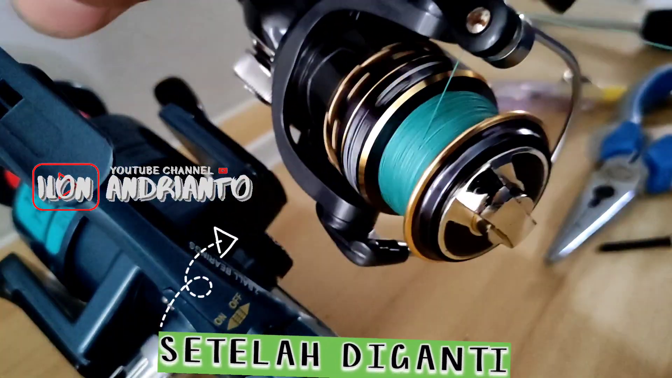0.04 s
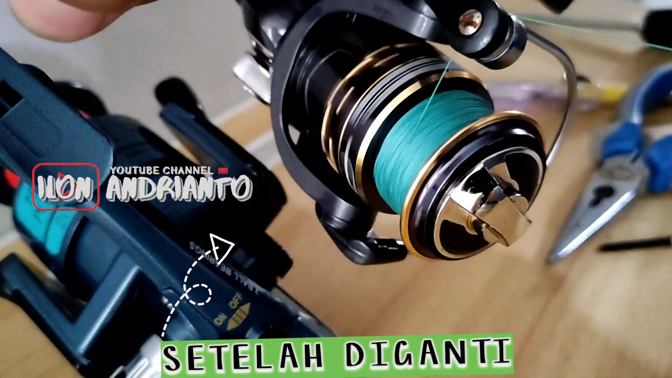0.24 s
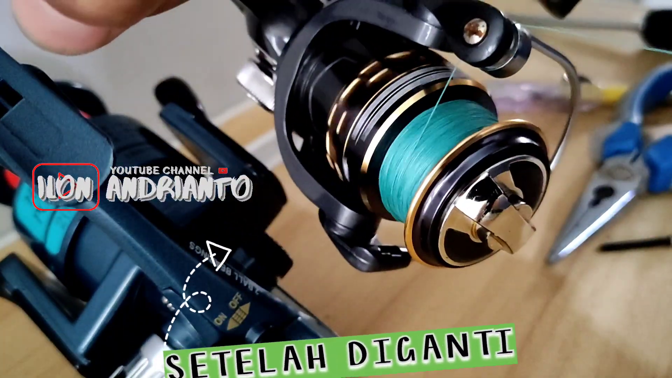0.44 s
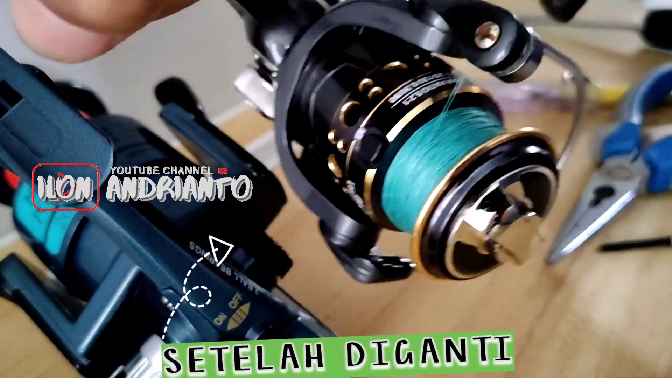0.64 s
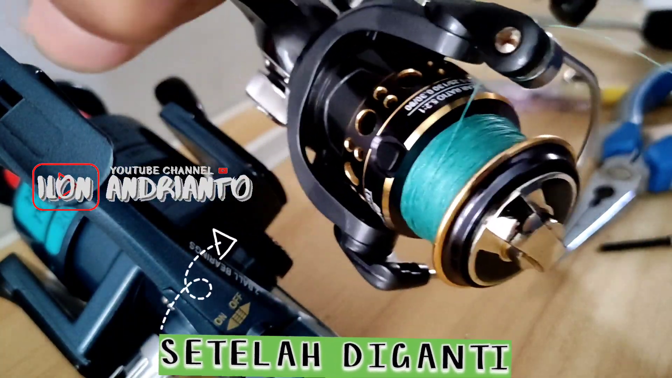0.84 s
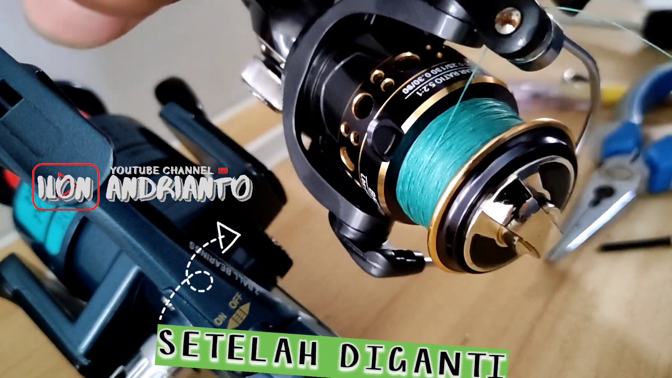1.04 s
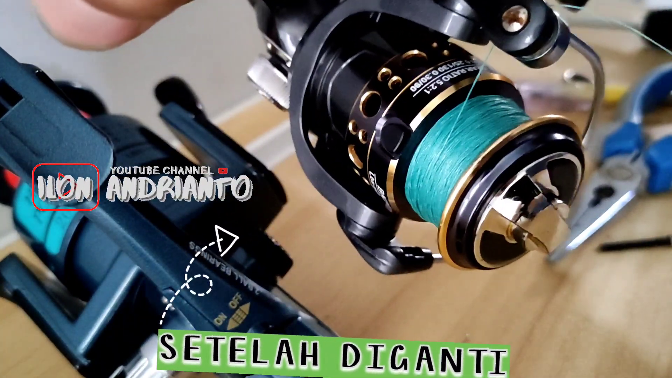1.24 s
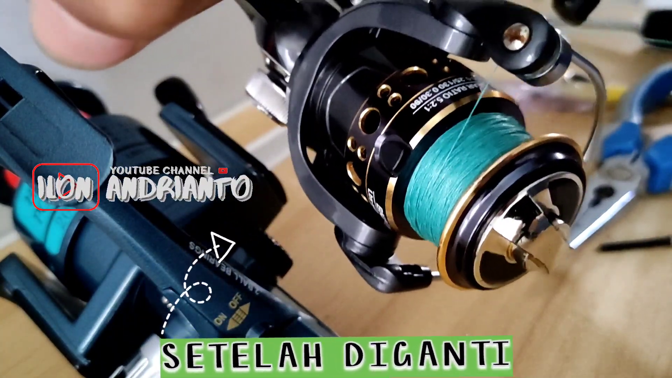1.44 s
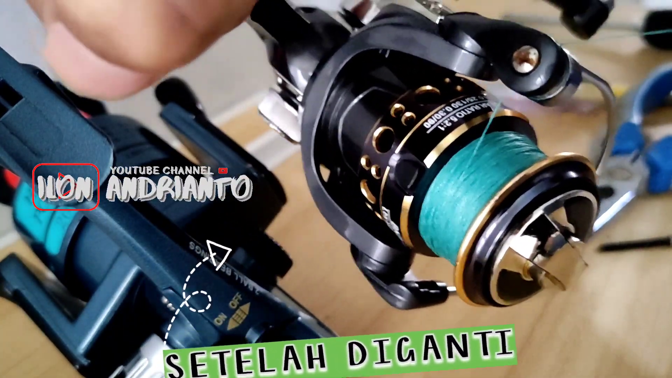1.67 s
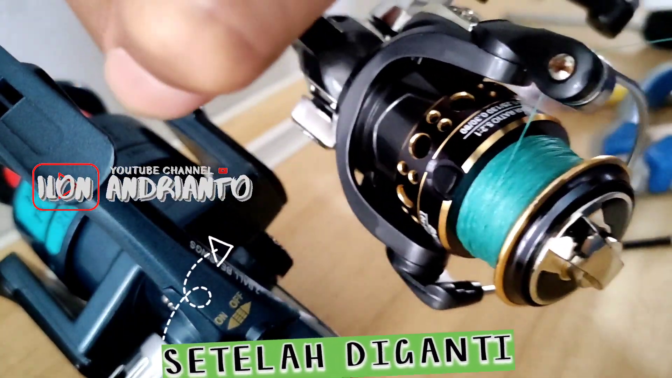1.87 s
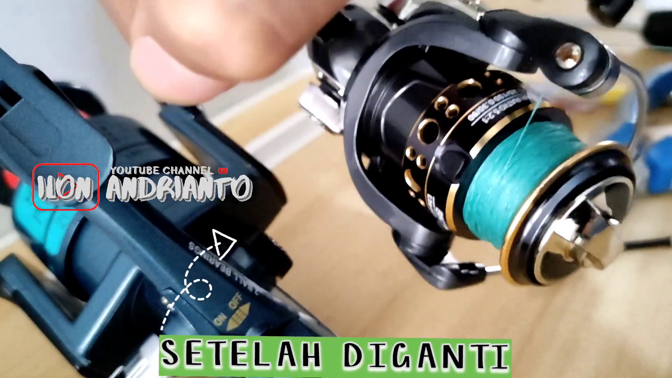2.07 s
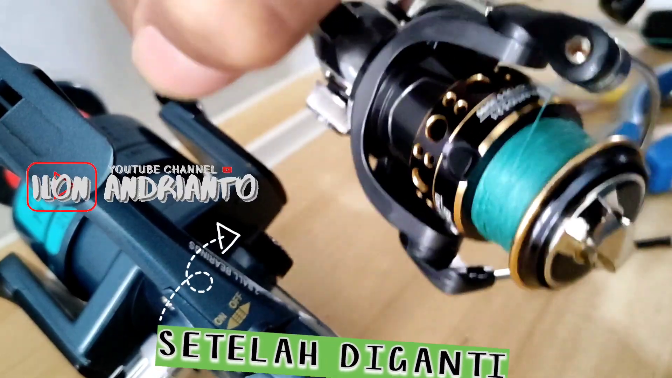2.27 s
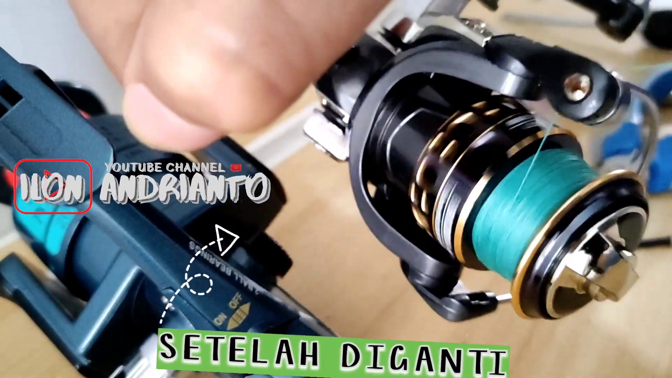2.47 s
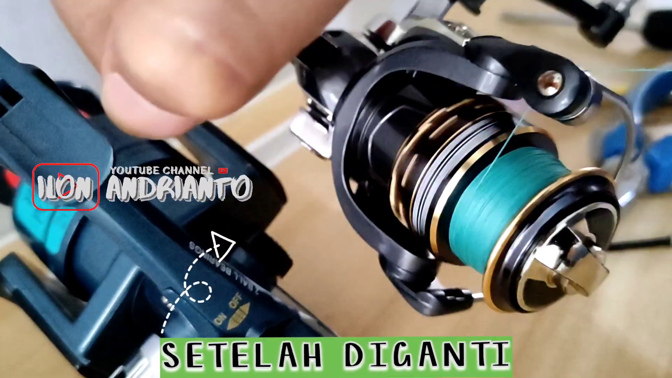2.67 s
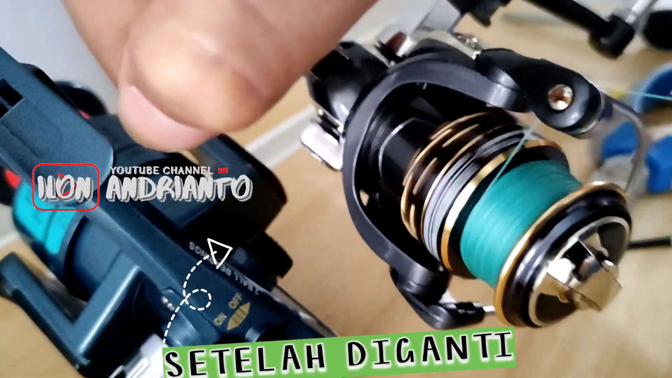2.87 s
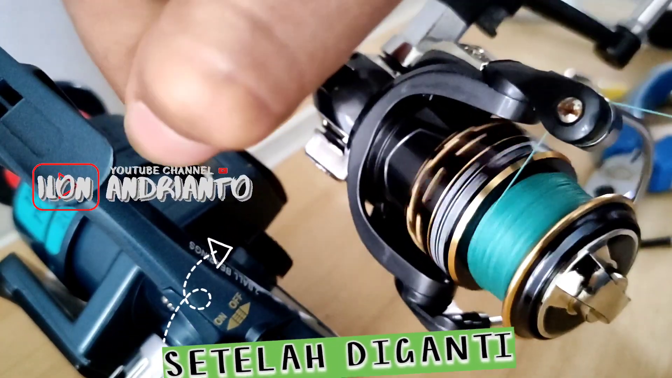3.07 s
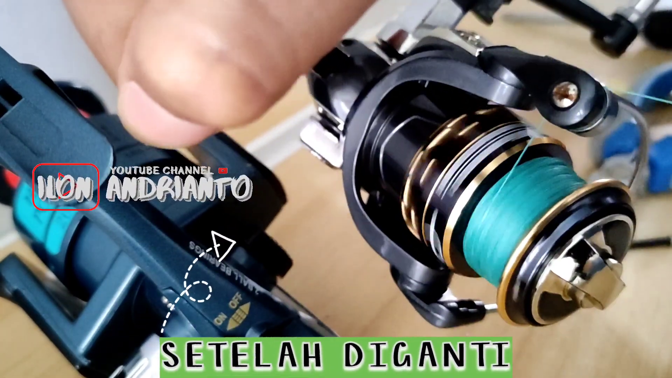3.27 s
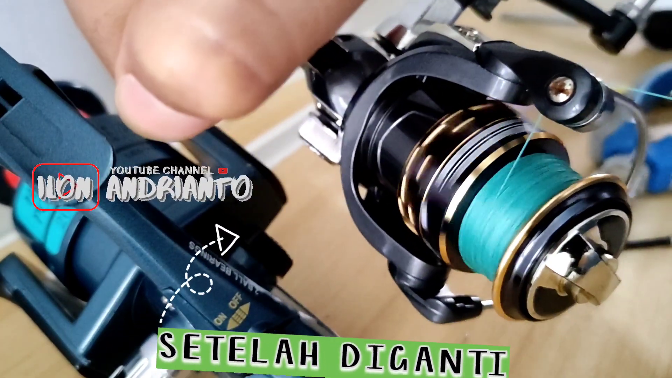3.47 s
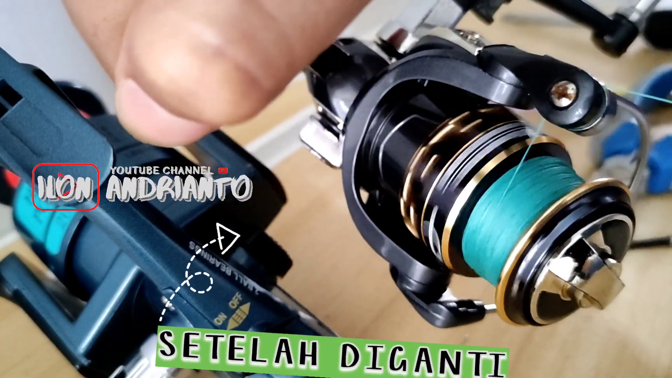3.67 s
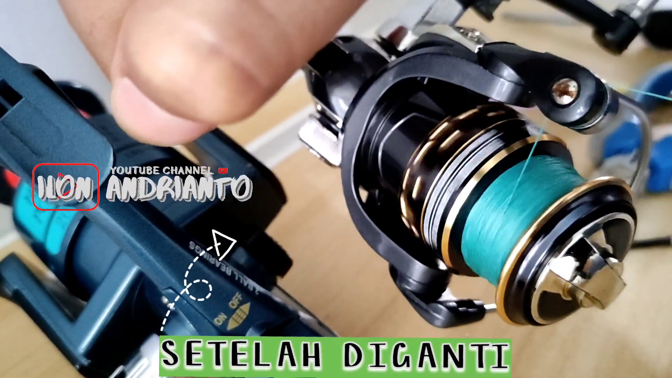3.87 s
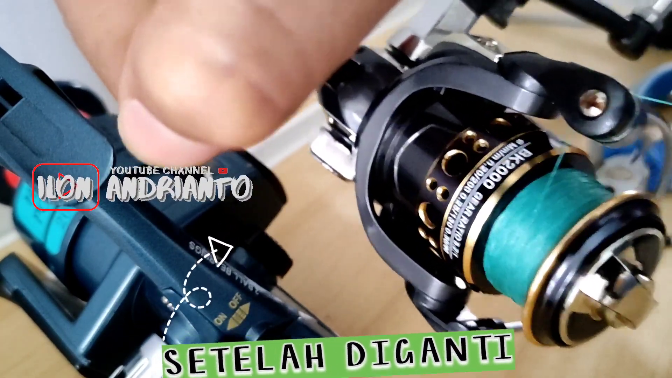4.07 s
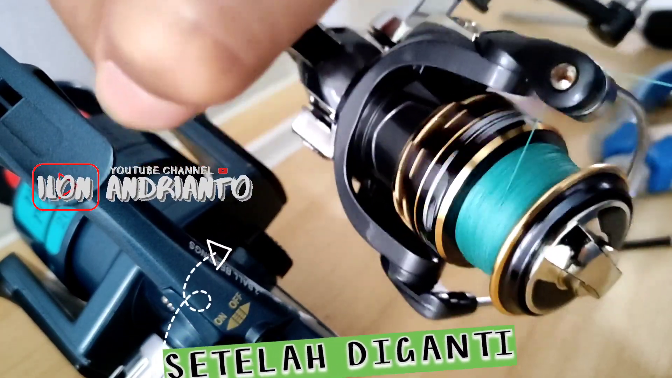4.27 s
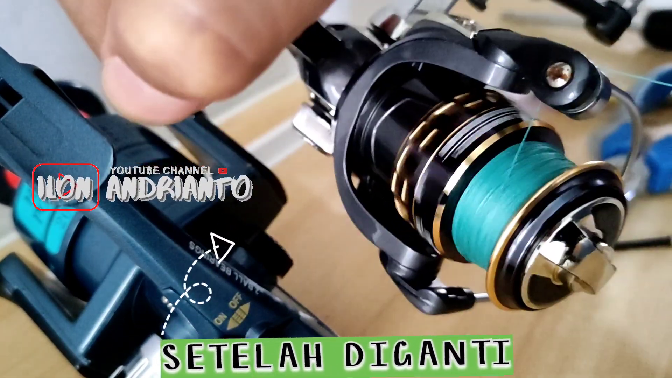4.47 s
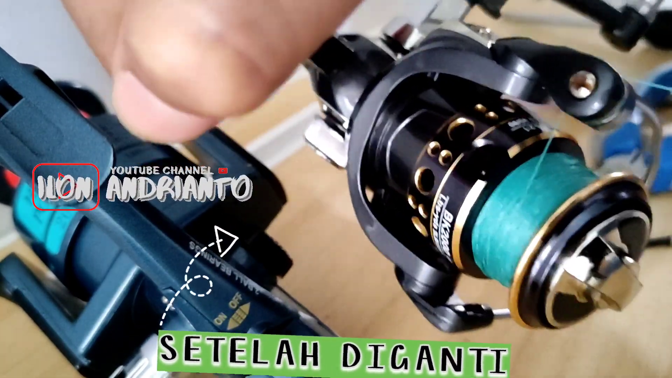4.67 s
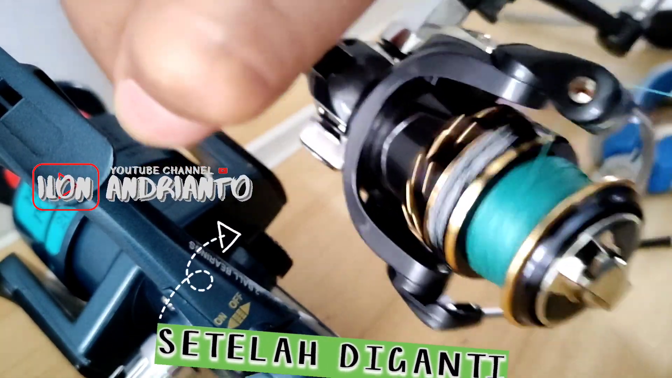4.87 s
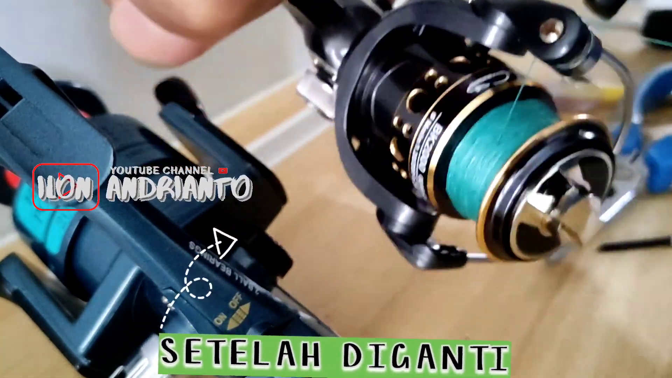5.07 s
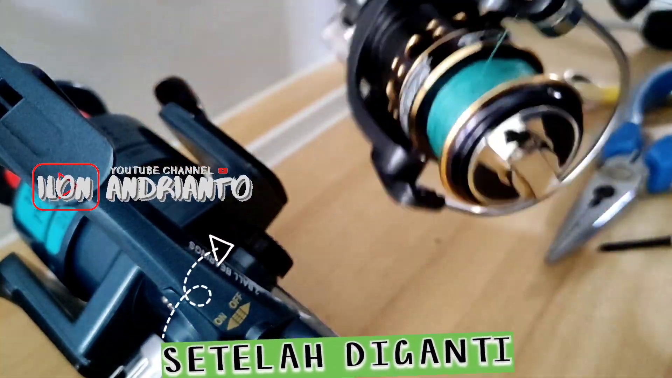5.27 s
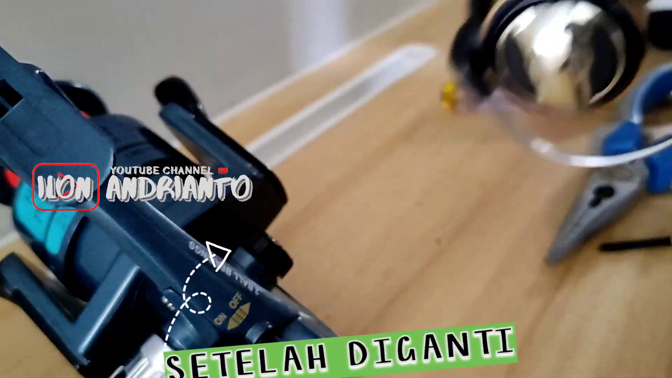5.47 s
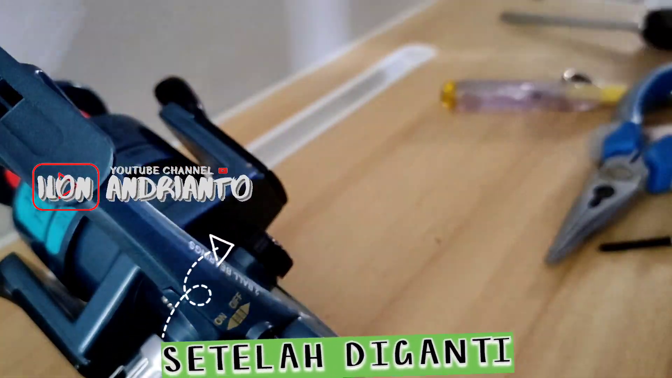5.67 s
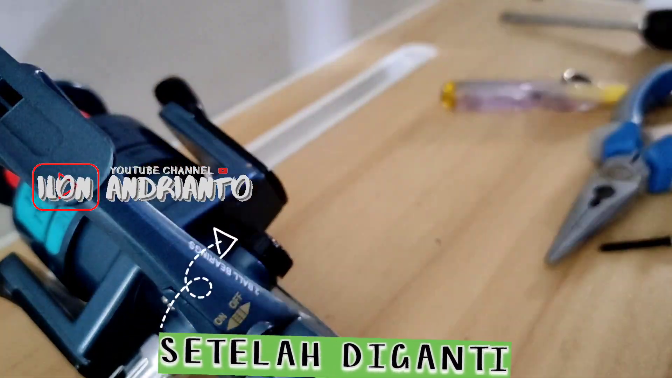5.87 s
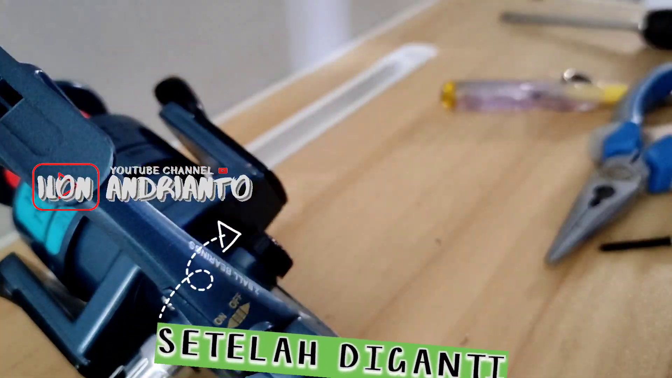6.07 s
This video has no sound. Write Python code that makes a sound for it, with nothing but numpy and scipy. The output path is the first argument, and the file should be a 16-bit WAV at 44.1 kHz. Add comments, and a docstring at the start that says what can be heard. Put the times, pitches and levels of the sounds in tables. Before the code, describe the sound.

A fishing reel's clicker ratchets in four rapid bursts close to the microphone, with a hard finger knock between the first two, in a quiet room.

```python
"""A fishing reel close to a stereo microphone in a quiet room gives up line in four pulls.
A spring pawl snaps over the teeth under the spool: short noise bursts through body resonances.
The metal spool rings on in four decaying modes; the reel swings and rubs in the hand as low thumps and noise.
Between the first two pulls a finger hisses past the left port and knocks hard, with faint taps then
and after the last pull. Short echoes and a low room tone with a hum lie behind."""
import sys
import numpy as np
from scipy import signal
from scipy.fft import rfft, irfft
from scipy.io import wavfile
from scipy.ndimage import uniform_filter1d

SR = 44100
rng = np.random.default_rng(int(sys.argv[2]) if len(sys.argv) > 2 else 0)


def dump(signal):
    """Clip the signal to [-1, 1] and save it as 16-bit WAV at the path in sys.argv[1]."""
    limited = np.clip(np.atleast_2d(signal).T, -1, 1)
    pcm = np.round(limited * 32767).astype(np.int16)
    wavfile.write(sys.argv[1], SR, pcm)


N = 269890  # samples

# One row for each snap of the pawl: t/s, relative blow level/dB,
# relative ring level/dB of the first and of the second spool mode 10 ms after the snap
PAWL_SNAPS = [(0.0001, -34, -41, -33.5), (0.025, -18.5, -48, -26), (0.0508, -16.5, -31.2, -27.0),
              (0.0872, -17, -30.8, -22.5), (0.1143, -16, -37.9, -22), (0.1385, -24, -30, -21),
              (0.156, -12, -34, -19.5), (0.173, -12, -42.7, -26.8), (0.1901, -20, -29, -36),
              (0.2072, -15, -25, -26), (0.225, -26, -21, -23), (0.2415, -19.3, -20, -19.5),
              (0.2572, -19.8, -24, -22.5), (0.274, -27, -24, -20), (0.2905, -14, -26, -33),
              (0.306, -16, -33, -25.5), (0.326, -24, -38, -30), (0.3441, -16, -26.5, -33.5),
              (0.3639, -20, -33, -28), (0.384, -17, -38, -14), (0.404, -29, -28.5, -17),
              (0.427, -23, -25.6, -14.5), (0.4504, -10, -43, -19.7), (0.4745, -15, -36.4, -24),
              (0.4962, -13, -30, -28.1), (0.5216, -21, -24, -35.6), (0.549, -13, -44, -25),
              (0.5793, -17.0, -29, -26), (0.6049, -25, -29, -24), (0.649, -13, -27.0, -33),
              (2.625, -12.5, -45, -29.2), (2.6527, -10, -47.4, -33), (2.673, -14, -35, -32),
              (2.692, -21, -30, -26), (2.7108, -13, -35.7, -27.5), (2.7314, -18, -32.1, -22),
              (2.7508, -13, -36, -36), (2.7679, -17, -34.1, -29.1), (2.785, -12.5, -34.7, -20),
              (2.802, -19, -25, -24), (2.8189, -13.5, -24, -19), (2.836, -18, -28, -26),
              (2.8537, -24, -36, -34), (2.8702, -16.1, -28, -31.2), (2.888, -7.5, -24, -25),
              (2.9063, -12, -29, -23.5), (2.9216, -16, -31.0, -32), (2.937, -16, -29.9, -31.2),
              (2.9498, -19, -22, -34.9), (2.9625, -19, -28, -20.5), (2.9766, -14.5, -37, -22),
              (2.993, -12, -27, -25), (3.0055, -22, -31.5, -23), (3.0182, -13, -38, -26),
              (3.031, -20, -37, -25), (3.0446, -30, -23, -17.5), (3.0577, -16, -19.5, -28),
              (3.072, -20.5, -36, -30), (3.0847, -16, -31, -27.9), (3.0978, -9, -29, -33),
              (3.11, -17, -35, -27.1), (3.122, -13, -26, -29.9), (3.1358, -24, -28.0, -25.2),
              (3.149, -13, -28, -28), (3.1636, -9, -35, -21.5), (3.1777, -11, -35, -21),
              (3.1914, -21, -39.0, -21), (3.2037, -15, -40, -23.0), (3.2157, -11, -41, -27),
              (3.2285, -17.5, -32, -25), (3.244, -28, -25.3, -16.5), (3.2582, -17, -29, -25),
              (3.2742, -20.0, -37, -25.5), (3.2899, -21, -38, -25.5), (3.3078, -15, -29, -30.8),
              (3.325, -15, -27, -40), (3.346, -19, -40, -36.2), (3.3689, -16.6, -28, -25.0),
              (3.3922, -14, -38, -30.1), (3.414, -11, -45.5, -26), (3.4399, -16.3, -37, -21.4),
              (3.4682, -12.5, -24, -38), (3.49, -19, -50, -36.1), (3.5158, -11.5, -43, -32),
              (3.542, -11, -36, -25.8), (3.568, -19, -25, -29), (3.59, -28, -33, -36.5),
              (3.6098, -18.9, -29.5, -29.7), (3.6337, -20, -29, -29), (3.657, -13, -30, -32),
              (3.6794, -12, -36, -29), (3.7067, -16, -48, -48), (3.7363, -15.5, -26.5, -45),
              (3.768, -18, -28.5, -32.4), (3.803, -13, -39, -23), (3.836, -17.5, -32.5, -42),
              (3.8649, -18, -19.5, -40.5), (3.895, -11, -24, -22), (3.9239, -11, -32, -20),
              (3.9616, -15, -23.5, -34), (3.9996, -20, -21.5, -30.3), (4.0344, -20.5, -25.5, -26.5),
              (4.2627, -13, -24, -22.5), (4.2794, -18, -34, -51), (4.3005, -14, -29.5, -25),
              (4.319, -15.0, -34, -22), (4.333, -12, -32, -30), (4.351, -20, -35, -23),
              (4.369, -19.6, -37, -24), (4.3857, -17.6, -31, -20.5), (4.4072, -25, -35, -27.5),
              (4.4287, -18.5, -27, -27), (4.45, -14, -24, -32.5), (4.47, -11, -35, -30),
              (4.4928, -12, -28, -29), (4.517, -19, -19, -23), (4.5432, -24, -32, -31),
              (4.5707, -17, -27, -24.5), (4.5988, -17.5, -30.4, -25.5), (4.6418, -11, -22, -36),
              (4.6743, -20, -25.7, -25), (4.9826, -11.5, -32, -39), (5.007, -14, -25, -24),
              (5.037, -15, -27.5, -42), (5.06, -11, -35.8, -26), (5.0857, -19, -29, -31),
              (5.1107, -23, -33, -31.5), (5.1395, -12, -25, -30.1), (5.1651, -17, -32, -34),
              (5.1968, -16, -25, -30)]


def amp(db):
    """Amplitude factor of a level in dB."""
    return 10 ** (np.asarray(db) / 20)


def evened(x):
    """Scales a signal to an rms of one."""
    return x / np.sqrt(np.mean(x ** 2) + 1e-20)


def read(points, hz):
    """Reads a (f/Hz, value) curve along a logarithmic frequency axis."""
    f, value = np.transpose(points)
    return np.interp(np.log(hz + 1), np.log(f + 1), value)


def level(rows):
    """Gain from (t/s, level/dB) rows, at -120 dB outside them."""
    s, db = np.transpose(rows)
    return amp(np.interp(np.arange(N) / SR, s, db, left=-120, right=-120))


def struck(s, size, shape, lead=0.):
    """Lays one shape at every time s, starting lead seconds early."""
    train = np.zeros(N + SR)
    np.add.at(train, np.round(np.asarray(s) * SR).astype(int), size)
    return signal.oaconvolve(train, shape)[round(lead * SR):][:N]


def noise(colour, same, lean, patchy_db):
    """Stereo noise of a given spectrum, likeness and balance, with drifting patches, at an rms of one."""
    frames, hz = N // 256 + 5, np.fft.rfftfreq(1024, 1 / SR)
    a, b, c, d, patches = rng.standard_normal((frames, 513, 5)).T
    patches = uniform_filter1d(patches, size=10, axis=0)
    patches = evened(uniform_filter1d(patches, size=10, axis=1))
    like = np.clip(read(same, hz), -1, 1)[:, None]
    side = amp(read(lean, hz)[:, None] / 2)
    left = a + 1j * b
    right = like * left + np.sqrt(1 - like ** 2) * (c + 1j * d)
    spectrum = np.array([left * side, right / side])
    spectrum *= amp(read(colour, hz)[:, None] + patchy_db * patches)
    return evened(signal.istft(spectrum, nperseg=1024, noverlap=768)[1][:, :N])


def teeth():
    """The tooth row for each snap: the ring of teeth goes round and round."""
    # The 15 teeth of one turn, each with its own colour: low, middle and high level/dB against the blow,
    # relative ring level/dB of the third and of the fourth spool mode
    tooth_rows = [(-11.5, 0, -3, -31, -34.5), (-11, 0.5, -0.5, -33, -43.5), (-7.5, 0.5, -4, -30, -40),
                  (-6.5, -1, 1.5, -45, -38), (-8.5, -4, 0, -38, -45.5), (-5.5, 2.5, 2.5, -35, -38),
                  (-5.5, 1.5, 0.5, -31, -45), (-7, -1, -1, -37.5, -50), (-2, 0, 1.5, -39, -41),
                  (-7, -4, -2, -29, -42), (-1.5, 1.5, 1.5, -39, -33.5), (-5.5, -7.5, -0.5, -36, -48),
                  (-5.5, -2, 1.5, -37, -38), (-5, -1.5, 1.5, -35, -44), (-8.5, -6.5, -0.5, -45, -36.5)]
    return np.transpose(tooth_rows)[:, np.arange(len(PAWL_SNAPS)) % len(tooth_rows)]


def blows():
    """Time, chatter length and low, middle and high body level of each snap; a slow pawl chatters longer."""
    # Chance from snap to snap in the low, middle and high body range: spread/dB
    colour_spread = (2.5, 3.5, 2)
    # Level of the low body range through the pulls: t/s, level/dB
    low_level = [(0, -1.5), (.65, -1), (2.6, 0), (3.4, 0.5), (4.05, 0.5), (4.3, -1), (4.7, -0.5), (5.0, -1),
                 (5.2, -3.5)]
    usual_db, follows = -19, (0.13, 0.72, 0.57)  # how far each range follows a harder or softer blow
    usual_gap_s, longest_gap_s = 0.023, 0.04
    usual_chatter_ms, chatter_spread, gap_power = 2.2, 0.2, 0.1
    s, blow_db = np.transpose(PAWL_SNAPS)[:2]
    luck = np.clip(rng.standard_normal((4, len(s))), -2, 1.5)
    gap = np.clip(np.diff(s, prepend=s[0] - usual_gap_s), .005, longest_gap_s)
    slowness = (gap / usual_gap_s) ** gap_power
    chatter_ms = usual_chatter_ms * slowness * np.exp(chatter_spread * luck[3])
    force_db = usual_db + np.outer(follows, blow_db - usual_db)
    colour_db = teeth()[:3] + np.reshape(colour_spread, (3, 1)) * luck[:3]
    colour_db[0] += np.interp(s, *np.transpose(low_level))
    return np.vstack([s, chatter_ms, force_db + colour_db])


def snaps(rise_ms=1.0, fall=0.86, lumps_db=1.86, shared=0.38, shift=0.018, uneven_db=2.56,
          side_db=0.4, strike=3.36):
    """The pawl lands and chatters for a few ms; the rattle passes through the reel body."""
    # Resonances of the reel body in a low, middle and high range:
    # f/Hz, nominal width/Hz, left level/dB, right level/dB
    body_modes = [
        [(1305, 890, -14, -11), (3200, 530, -6, -5), (3790, 676, 1, 1), (4700, 970, -2.5, -4.5)],
        [(5656, 590, -7.5, -5), (6760, 300, -9.5, -4.5), (7840, 400, -19.5, -8.5), (8950, 370, -15.5, -4)],
        [(10800, 790, -3, -16), (11990, 1170, -4, -11), (13050, 620, -17, -9), (13940, 4700, -5, -12)],
    ]
    s, chatter_ms, *range_db = blows()[:, :, None]
    count, size, lead = len(s), 1024, 256  # a snap has 1024 samples, 256 of them ahead of the contact
    ms = (np.arange(size) - lead) / SR * 1000
    hz = np.fft.rfftfreq(size, 1 / SR) + 1
    rise = np.exp(np.minimum(ms, 0) / rise_ms)
    burst = np.where(ms < 0, rise, np.exp(-(abs(ms) / (fall * chatter_ms)) ** 1.25))
    lumps = evened(uniform_filter1d(rng.standard_normal((count, size)), size=20))
    common, left, right = rng.standard_normal((3, count, size))
    grain = np.sqrt(shared) * common + np.sqrt(1 - shared) * np.array([left, right])
    rattle = rfft(burst * amp(lumps_db * lumps) * grain)
    # the first sharp contact
    rattle = rattle + strike * np.exp(-2j * np.pi * np.arange(len(hz)) * lead / size)
    clicks = 0
    for db, modes in zip(range_db, body_modes):
        body = 0
        for mode_hz, width, *port_db in modes:
            # the body's pitches and levels wander a little by chance from snap to snap
            luck = rng.standard_normal((3, count, 1))
            centre = mode_hz * (1 + shift * luck[2])
            peak = 1 / (1 + .64j * (hz - centre ** 2 / hz) / width) ** 2
            gain = amp(np.reshape(port_db, (2, 1, 1)) + uneven_db * luck[:2])
            body = body + gain * np.sqrt(SR / (np.pi * width)) * peak
        sound = rattle * body
        # chance sets the grain of a snap; its energy follows the blow
        energy = np.linalg.norm(sound, axis=2, keepdims=True)
        energy = energy / np.linalg.norm(burst, axis=1, keepdims=True)
        sway = amp(side_db * rng.standard_normal((2, count, 1)))
        clicks = clicks + amp(db) * sway * sound * energy.mean(axis=1, keepdims=True) / energy
    out = np.zeros((2, N + size))
    for start, sound in zip(s[:, 0], np.moveaxis(irfft(clicks), 1, 0)):
        out[:, round(start * SR):][:, :size] += sound
    out = out[:, lead:lead + N]
    return np.array([np.roll(out[0], 4), out[1]])  # the left port is a few cm further away


def room(x, turn_s=.12):
    """Sparse echoes, each band dying at its own speed; three tails fade in and out in turn to keep changing."""
    # Decay of the room: f/Hz, time to fall by 60 dB t/s
    decay = [(300, 0.39), (3000, .15), (8000, 0.12), (15000, 0.06)]
    out = np.zeros((2, N))
    length = SR // 3
    starts = np.arange(40, length - 20, 20)
    for k in range(3):
        echoes = np.zeros((2, length))
        at = starts + rng.integers(0, 20, (2, len(starts)))  # one echo in every 20 samples
        np.put_along_axis(echoes, at, rng.choice([-1., 1.], at.shape), 1)
        hz, t, bands = signal.stft(echoes, SR, nperseg=256)
        fading = bands * amp(-60 * t / read(decay, hz)[:, None])
        tail = signal.istft(fading, SR, nperseg=256)[1]
        share = np.sqrt(2 / 3) * np.cos(np.pi * (np.arange(N) / SR / turn_s + k / 3))
        out += signal.oaconvolve(x * share, tail / np.linalg.norm(tail[0]), axes=1)[:, :N]
    return out


def spool(settle_s=0.000097, waver_hz=60, turn_db=2.5):
    """Each snap meets a mode in or out of step, so its ring jumps up or down, then dies freely."""
    # Pitch of each spool mode: f/Hz
    mode_hz = (5643, 8972, 11955, 14442)
    # Time for each spool mode to fall by 60 dB: t/s
    mode_t60 = (.27, .28, .1, .33)
    # Each spool mode at the ports: left level/dB, right level/dB, split of the mode pair f/Hz,
    # share of the twin, depth of waver
    mode_ports = [(-6.5, 0, 64, 0.32, 0.3), (-11.5, 4.5, 10, 0.3, 0), (-1, -9, 90, 0.82, 0.7),
                  (5, 5.5, 30, .3, 0.45)]
    ring_spread_db = 2  # chance in the third and fourth mode
    s, *strong_db = np.transpose(PAWL_SNAPS)[[0, 2, 3]]
    t, out = np.arange(N) / SR, np.zeros((2, N))
    last = np.clip(np.searchsorted(s, t - .001) - 1, 0, None)  # the latest snap
    luck = np.minimum(rng.standard_normal((2, len(s))), 1)
    ring_db = np.vstack([strong_db, teeth()[3:] + ring_spread_db * luck])
    r = np.exp(-1 / (settle_s * SR))
    knots = np.arange(0, N / SR + 1, 1 / 200)
    for mode_db, hz, t60, ports in zip(ring_db, mode_hz, mode_t60, mode_ports):
        left_db, right_db, split_hz, twin, waver = ports
        steps = rng.standard_normal((len(s), 4))
        ring = amp(mode_db[last] - 60 * (t - s[last] - .01) / t60)
        carrier = np.exp(2j * np.pi * hz * t)
        beat = twin * np.exp(2j * np.pi * split_hz * t)
        for port, db in enumerate((left_db, right_db)):
            # the spool turns, so each port hears its own changing mix of the split pair
            phase = np.exp(1j * np.cumsum(1.03 * steps[:, 2] + 0.735 * steps[:, port]))
            facing = amp(turn_db * steps[:, 3] * (db < max(left_db, right_db)))  # weaker port only
            pair = 1 + beat * np.exp(3j * steps[:, port])[last]
            low_pass = signal.butter(2, waver_hz, fs=200)
            drift = signal.lfilter(*low_pass, rng.standard_normal((2, len(knots))))
            pair += waver * np.interp(t, knots, drift[0] + 1j * drift[1])
            # smoothing softens each jump
            swing = signal.lfilter([1 - r], [1, -r], ring * pair * (phase * facing)[last])
            out[port] += amp(db) * (swing * carrier).real
    return out


def jolts(hz=130, t60=0.01, load=0.44, load_s=0.0015, left_db=-6):
    """The spring loads the reel slowly, lets go, and the reel swings back in the hand."""
    # The hardest swings, on top of the usual ones: t/s, relative level/dB
    jerks = [(0.1123, -11), (0.1902, -19), (0.3829, -17), (2.8196, -16), (3.1352, -15), (3.1639, -13),
             (3.3702, -19), (3.416, -14.5), (3.6805, -18), (3.9245, -14)]
    usual_db, spread_db = -25, 5.5  # relative swing after a snap
    s = np.transpose(PAWL_SNAPS)[0]
    db = usual_db + spread_db * np.clip(rng.standard_normal(len(s)), -3, 1.5)
    s, db = np.hstack([[s, db], np.transpose(jerks)])
    t = np.arange(-round(0.00971 * SR), round(.03 * SR)) / SR
    swing = load * np.cos(2 * np.pi * hz * t) - 1.15 * np.sin(2 * np.pi * hz * t)
    shape = np.where(t < 0, load * np.exp(t / load_s), swing * amp(-60 * t / t60))
    right = struck(s, amp(db), shape, 0.00965)
    # the left port is further from the hand: later, duller and softer
    left = amp(left_db) * uniform_filter1d(np.roll(right, 25), size=30)
    return np.array([left, right])


def strain():
    """The hand works on the reel: low noise that swells with the pulls."""
    # Hand on the reel, stretch by stretch: t/s, level/dB
    hand_level = [
        [(0.0, -39.5), (0.276, -41.5), (0.75, -48)],
        [(2.55, -73), (2.71, -41), (2.838, -41.5), (3.074, -38.5), (3.41, -49.5), (3.628, -47.5),
         (3.814, -40.5), (4.15, -48)],
        [(4.2, -73), (4.34, -39), (4.452, -41.5), (4.8, -52)],
        [(4.9, -49.5), (5.3, -49.5)],
    ]
    # Relative spectral density: f/Hz, level/dB
    hand_colour = [(25, -47), (60, -27), (110, 9), (200, -2), (400, -7), (1500, -34), (3000, -30)]
    likeness, lean = [(30, 0.28), (120, 0.85), (600, 0.54)], [(60, 4.5), (1500, -18.0)]
    return sum(map(level, hand_level)) * noise(hand_colour, likeness, lean, 1.3)


def room_tone():
    """The quiet room: steady coloured noise, strongest as a low hum."""
    # Relative spectral density of the room tone: f/Hz, level/dB
    tone_colour = [(18, -76), (30, -53), (80, -15), (135, -1), (217, -6.5), (247, -4), (275, -6),
                   (517, -15), (622, -10.5), (853, -19), (1030, -17), (6840, -31.5), (8450, -29),
                   (15100, -40), (16300, -51)]
    # Likeness of the two ports: f/Hz, share
    tone_same = [(40, 0.7), (120, 0.99), (250, 0.93), (500, 0.48), (1000, 0), (16000, 0)]
    # Left against right port: f/Hz, level/dB
    tone_lean = [(60, 0), (180, -1), (550, 1), (1650, 0.5), (4970, -2.5), (15000, 1)]
    tone = amp(-41.5) * noise(tone_colour, tone_same, tone_lean, 1.96)
    tone[0] = np.roll(tone[0], 20)  # the room's hum comes from the right
    return tone


def finger():
    """Skin hisses along the case and taps it: a bright crack on a low push."""
    # Finger sliding on the case, in two stretches: t/s, level/dB
    slide_level = [
        [(1.74, -73), (1.776, -63), (1.782, -47), (1.844, -40), (1.878, -54), (1.96, -37.5), (2.078, -53),
         (2.144, -75), (2.16, -53)],
        [(2.222, -34), (2.24, -49), (2.278, -60), (2.294, -62), (2.3, -73)],
    ]
    # Relative spectral density of the slide: f/Hz, level/dB
    slide_colour = [(3000, -9), (6000, -14), (8500, -19), (10500, -3), (13000, -17), (16000, -12)]
    # Taps on the case: t/s, relative crack level/dB, push level/dB, push f/Hz,
    # length t/s (the swell peaks halfway), right port level/dB against the left
    case_taps = [(1.783, -39, -60, 400, .004, -15), (2.186, -30, -35, 300, 0.012, -17),
                 (2.2055, -7.5, -12.5, 810, 0.0016, -39), (2.2082, -12.5, -6, 410, 0.0015, -37),
                 (2.212, -27, -31, 412, 0.0029, -30), (2.217, -23, -37, 400, 0.0025, -32),
                 (2.229, -31, -49, 400, 0.005, -25), (2.325, -40, -40, 540, 0.0036, -5),
                 (6.055, -36.5, -42, 250, 0.0035, -9), (6.071, -43, -40, 252, 0.0056, -1)]
    # Relative spectral density of the crack: f/Hz, level/dB
    crack_colour = [(530, -39), (900, -4), (1950, -12), (3550, -13.5), (4010, -13), (4520, -10),
                    (5400, -14), (6300, -10.5), (8300, -13), (10900, -2.5), (16000, -9)]
    unlike, level_lean = [(100, 0), (16000, 0)], [(100, 0), (16000, 0)]
    hiss = noise(slide_colour, unlike, [(5000, 6), (12000, 23)], 4.0)  # close on the left port
    out = sum(map(level, slide_level)) * hiss
    crack = noise(crack_colour, unlike, level_lean, 2.4)
    t = np.arange(round(.06 * SR)) / SR
    for s, crack_db, push_db, hz, length, right_db in case_taps:
        span = slice(round(s * SR), min(round(s * SR) + len(t), N))
        size = span.stop - span.start
        swell = 2 * t / length * np.exp(1 - 2 * t / length)
        push = -amp(push_db) * swell * np.sin(2 * np.pi * hz * t)
        tap = amp(crack_db) * swell[:size] * crack[:, span] + push[:size]
        out[:, span] += tap * amp([[0], [right_db]])
    return out


def scene():
    """Reel and its room, spool, hand, finger and room tone."""
    reel = snaps()
    hand = jolts() + strain()
    return reel + amp(-5) * room(reel) + spool() + hand + finger() + room_tone()


def record(dry):
    """The microphone drops deep bass and the top treble; then a steep band limit at 16 kHz."""
    x = signal.sosfilt(signal.butter(3, 48, "high", fs=SR, output="sos"), dry)
    x = signal.sosfilt(signal.butter(4, 15600, fs=SR, output="sos"), x)
    band_limit = signal.firwin(301, 16000, window=("kaiser", 11), fs=SR)
    return signal.oaconvolve(x, band_limit[None], "same")


dry = scene()
out = record(dry)
dump(out)
```